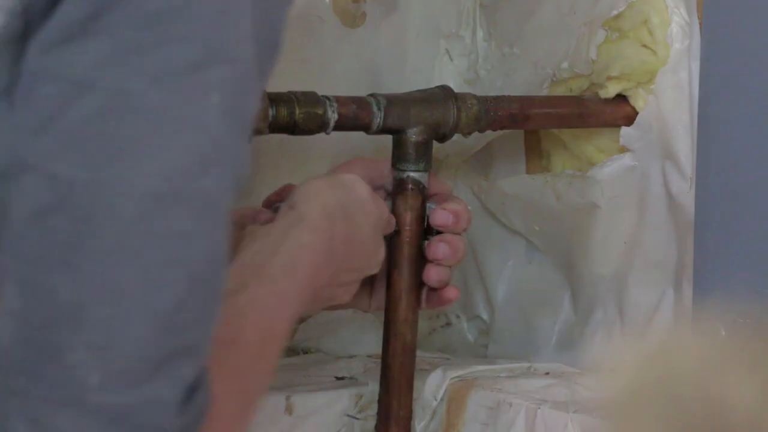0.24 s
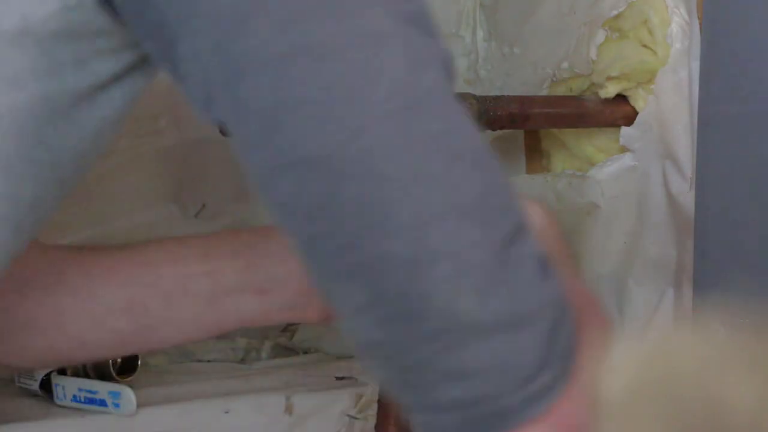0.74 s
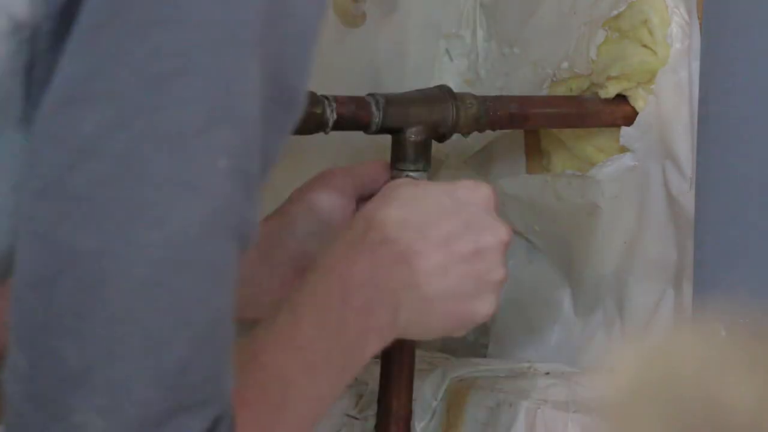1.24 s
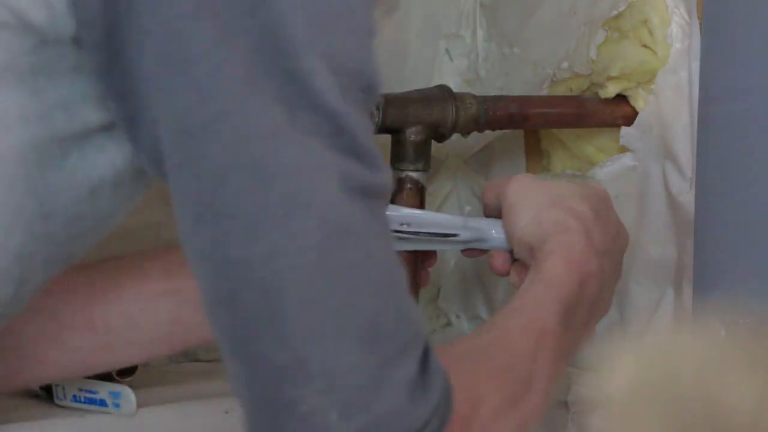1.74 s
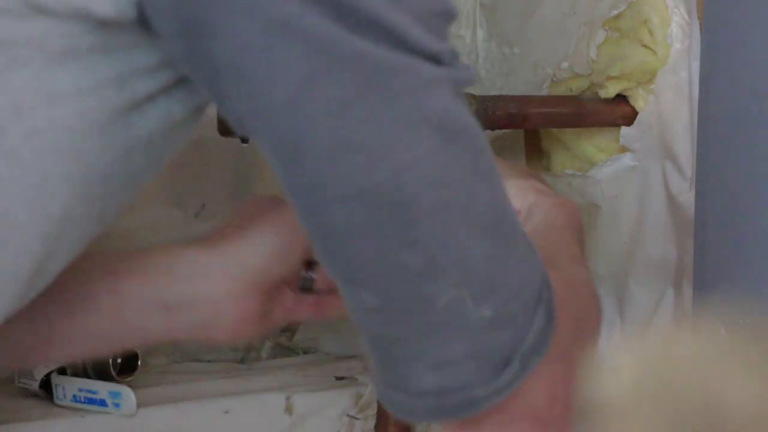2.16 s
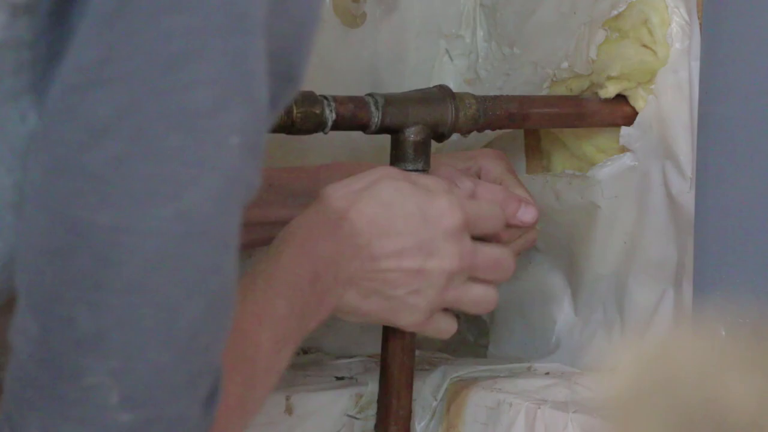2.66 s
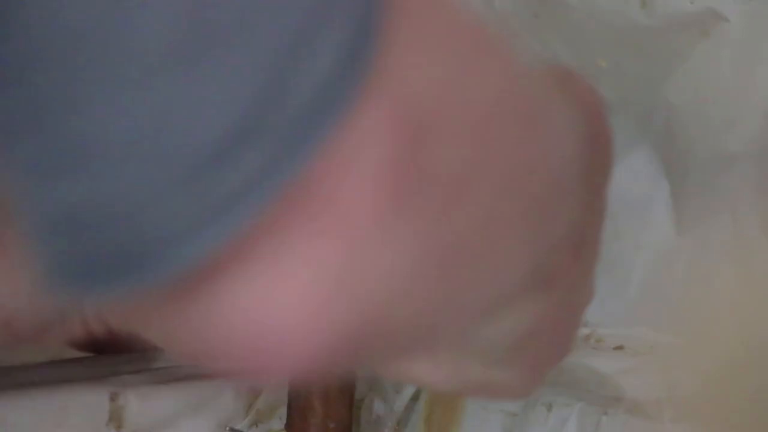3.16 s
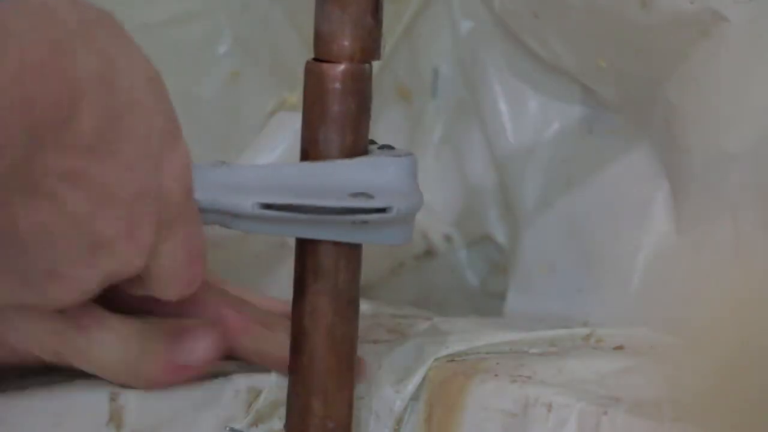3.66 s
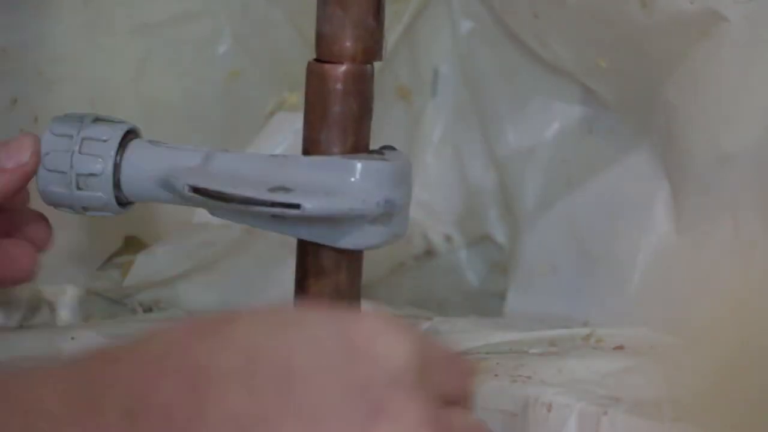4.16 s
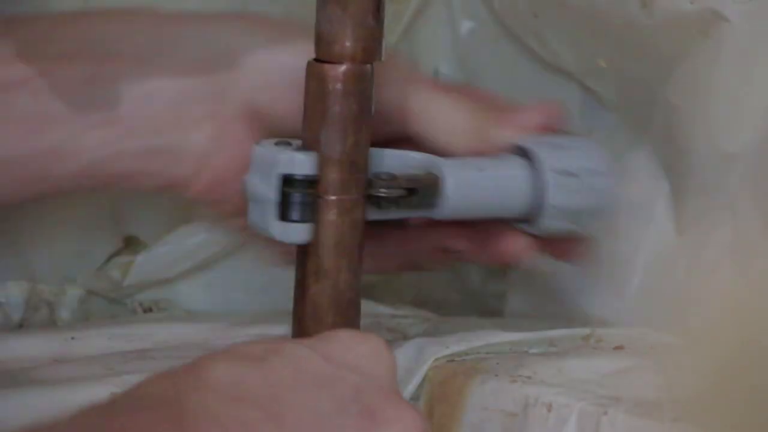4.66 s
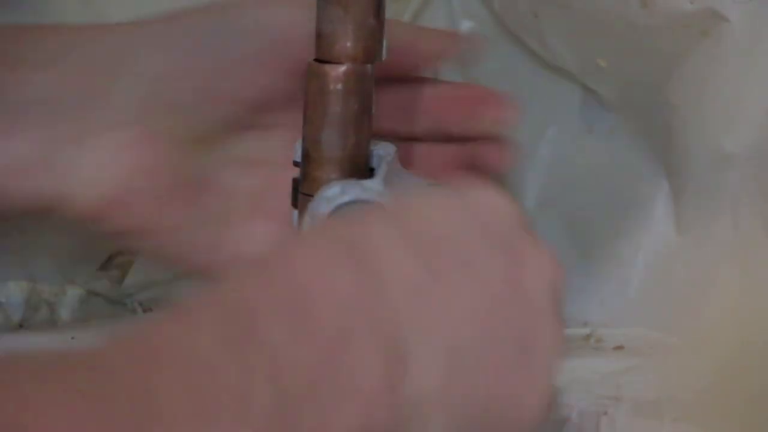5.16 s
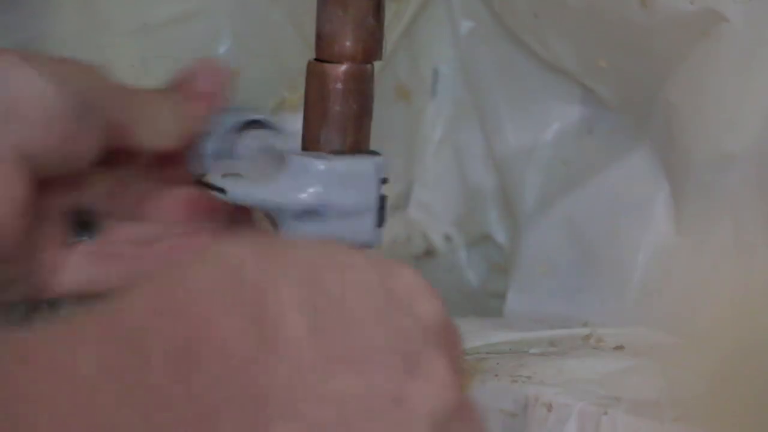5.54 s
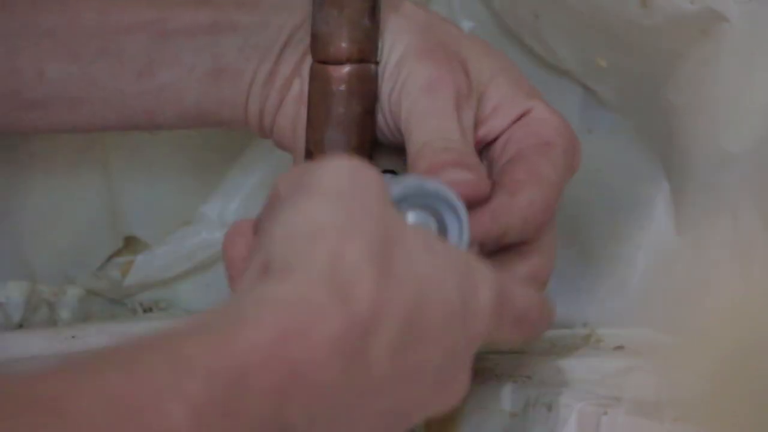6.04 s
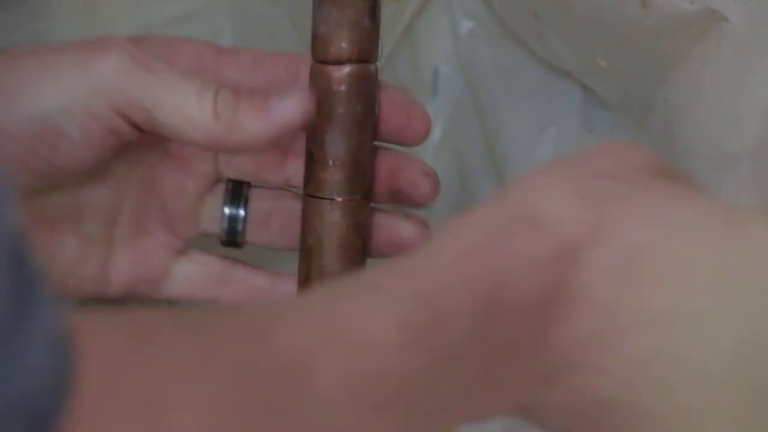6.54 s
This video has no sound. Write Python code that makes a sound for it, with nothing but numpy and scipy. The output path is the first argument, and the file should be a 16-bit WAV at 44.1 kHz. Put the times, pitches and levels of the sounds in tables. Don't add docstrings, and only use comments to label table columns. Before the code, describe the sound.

A tubing cutter scrapes and clicks around a copper pipe in a quiet basement, with soft knocks, low rumble and one loud hollow clank near the end.

```python
import sys
import numpy as np
from scipy import signal
from scipy.fft import rfft, irfft
from scipy.io import wavfile
from scipy.ndimage import uniform_filter1d

SR = 44100
rng = np.random.default_rng(int(sys.argv[2]) if len(sys.argv) > 2 else 0)


def volts_from_db(level):
    exponent = np.asarray(level, float) / 20
    return 10 ** exponent


def master(y):
    cut = np.clip(np.atleast_2d(y).T, -1, 1)
    pcm = np.round(cut * 32767)
    wavfile.write(sys.argv[1], SR, pcm.astype(np.int16))


N = 299968

# centre in Hz, width in Hz, level in dB.
CUTTER_MODES = [(2190, 490, -1), (3006, 335, 0), (3300, 216, 5.5), (3554, 423, 1.5), (4730, 1040, -8.5),
                (1750, 187, -2)]
# centre in Hz, width in Hz, level in dB.
EDGE_MODES = [(5030, 1150, 4), (6000, 2800, 3), (8300, 3060, 2.5), (10340, 4500, -1.5), (13600, 11200, -15)]
# centre in Hz, width in Hz, level in dB.
BODY_MODES = [(786, 760, 4.5), (1113, 260, 11), (1326, 183, 8.5), (1926, 320, 8)]
# centre in Hz, width in Hz, level in dB.
PIPE_MODES = [(203.5, 14, -4.5), (285, 65.4, 3.5), (412, 52, 0.5), (465.5, 85, -2), (720, 230, -17.5),
              (1000, 160, -14), (1464, 350, -19), (1750, 480, -19.5)]


def unit(x):
    return x / np.sqrt(np.mean(x ** 2))


def add(out, start_s, x):
    i = int(start_s * SR)
    out[i:i + len(x)] += x[:N - i]


def resonance(x, hz, width_hz):
    b, a = signal.iirpeak(hz, hz / (1.956 * width_hz), fs=SR)
    once = signal.lfilter(b, a, x)
    return signal.lfilter(b, a, once)


def modes(x, table):
    power = 0
    total = 0
    for k, (hz, width_hz, db) in enumerate(table):
        power += np.pi * width_hz / SR * volts_from_db(db) ** 2
        total = total + (-1) ** k * volts_from_db(db) * resonance(x, hz, width_hz)
    return total / np.sqrt(power)


def walk(rate_hz):
    hold = int(SR / rate_hz)
    steps = np.repeat(rng.standard_normal(N // hold + 1), hold)
    slewed = uniform_filter1d(uniform_filter1d(steps, hold), hold)
    return unit(slewed[:N])


def grit(per_s, spread_db):
    hit = rng.random(N) < per_s / SR
    size = volts_from_db(spread_db * np.minimum(rng.exponential(size=N), 3.5))
    impacts = unit(hit * size * rng.standard_normal(N))
    return unit(impacts + 0.6 * rng.standard_normal(N))


def swell(t, rise_s, t60_s):
    up = np.sin(np.pi / 2 * np.clip(t / max(rise_s, 1 / SR), 0, 1)) ** 2
    fade = 1000 ** (-np.maximum(t - rise_s, 0) / max(t60_s, 0.004))
    return up * fade


def strokes(table, rest_db, second_rest_db):
    ends_db = -17
    t = np.arange(N) / SR
    first, second = volts_from_db(rest_db), volts_from_db(second_rest_db)
    for start, top, end, db, second_db in table:
        away = (t - top) / np.where(t < top, top - start, end - top)
        gain = volts_from_db(db + ends_db * away ** 2)
        first = np.hypot(first, gain)
        second = np.hypot(second, volts_from_db(second_db) * gain)
    return first, second


def basement():
    # frequency in Hz, density in dB per Hz.
    hiss_curve = [(15, -54), (25, -23), (49, -4), (87, -9.5), (123, -26), (185, -28), (206, -8.5),
                  (263, -22), (326, -13), (363, -16), (754, -18), (1370, -17), (16000, -27.5)]
    # frequency in Hz, rms level in dB, wobble in dB.
    hum_partials = [(62, -81, 1), (120, -67.5, -0.5), (183, -76, 0.5)]
    hiss_db = -64.5
    curve_hz, curve_db = np.transpose(hiss_curve)
    f = np.maximum(np.arange(N // 2 + 1) * SR / N, 1)
    colour = volts_from_db(np.interp(np.log(f), np.log(curve_hz), curve_db))
    hiss = unit(irfft(rfft(rng.standard_normal(N)) * colour, N))
    t = np.arange(N) / SR
    hum = np.zeros(N)
    for hz, db, wobble_db in hum_partials:
        level = np.sqrt(2) * volts_from_db(db + wobble_db * walk(4.92))
        hum += level * np.sin(2 * np.pi * hz * t + 0.5 * walk(4.1))
    return volts_from_db(hiss_db) * hiss + hum


def rings():
    # start in seconds, fade t60 in seconds,
    # pitch in Hz, peak in dB.
    slips = [(2.625, 0.053, 3470, -56), (3.635, 0.043, 3670, -43.5), (3.677, 0.042, 1530, -40),
             (3.768, .05, 1505, -53), (4.006, 0.023, 3300, -50), (4.27, 0.028, 3300, -52),
             (4.63, 0.2, 1744, -60), (5.645, 0.05, 4270, -59), (5.648, .05, 9150, -65),
             (5.655, .04, 10000, -68), (5.703, .02, 15200, -64), (5.772, 0.081, 10000, -60),
             (5.775, .06, 13700, -68), (5.774, 0.065, 3230, -54), (5.815, .02, 3300, -67),
             (6.005, 0.13, 116, -38), (6.035, 0.055, 940, -44), (5.617, 0.032, 1510, -35),
             (6.235, 0.04, 1750, -51), (6.309, 0.043, 1640, -46.5), (6.325, 0.068, 95, -38.5),
             (6.613, 0.018, 1590, -38), (6.598, 0.045, 3470, -47.5), (6.617, 0.039, 720, -25),
             (6.618, 0.1, 114, -35.5), (6.639, 0.029, 757, -30.5)]
    # start in seconds, fade t60 in seconds, pitch in Hz, peak in dB.
    struck = [
        (6.0, 0.14, 3650, -46),
        (6.0, 0.074, 2306, -40.5),
        (6.163, 0.043, 896, -54),
        (6.185, 0.12, 930, -54),
        (6.6125, 0.023, 1000, -21.5),
    ]
    t = np.arange(SR // 3) / SR
    out = np.zeros(N)
    for table, rise_share in [(slips, 0.15), (struck, 0.082)]:
        for start, t60, hz, db in table:
            drift = np.cumsum(rng.standard_normal(len(t))) * 0.04
            flutter = 1 + 7 * uniform_filter1d(rng.standard_normal(len(t)), size=200)
            tone = np.sin(2 * np.pi * hz * t + drift)
            add(out, start, volts_from_db(db) * swell(t, rise_share * t60, t60) * flutter * tone)
    return out


def knocks():
    # start in seconds, peak in dB, pitch in Hz,
    # t60 in seconds.
    hand_knocks = [(0.373, -35, 105, 0.07), (0.392, -43.5, 95, 0.12), (0.47, -55, 94.2, 0.19),
                   (2.655, -47.5, 350, 0.033), (3.448, -51, 290, 0.065), (3.472, -38.5, 297, 0.065),
                   (3.489, -41.5, 296, 0.042), (3.526, -42, 325, 0.037), (3.683, -39, 567, 0.03),
                   (3.69, -39.5, 236, 0.033), (3.827, -50, 368, 0.05), (3.84, -53.5, 320, 0.059),
                   (3.869, -52, 126, 0.17), (4.284, -43, 328, 0.038), (4.295, -49, 527, 0.047),
                   (4.308, -48, 115, 0.05), (4.384, -44, 420, 0.021), (4.965, -42, 205, 0.069),
                   (5.135, -49.5, 222, 0.037), (5.157, -49, 108, 0.088), (5.522, -50, 426, 0.1),
                   (5.615, -28, 340, 0.025), (5.693, -26, 265, 0.038), (6.505, -43.5, 147, 0.12),
                   (6.6126, -12, 447, 0.027), (6.623, -22.5, 420, 0.028), (6.634, -31, 396, 0.04),
                   (6.641, -25.5, 488, 0.031), (6.655, -40, 316, 0.07)]
    # start in seconds, peak in dB, pitch in Hz, t60 in seconds,
    # overtone relative to peak in dB.
    tool_knocks = [(0.351, -34.5, 330, 0.023, 5), (0.361, -33, 103, 0.037, 9.5),
                   (0.57, -46.5, 258, 0.024, -10), (0.617, -53, 128, 0.06, 10), (1.924, -45, 136, 0.059, 0),
                   (2.439, -45.5, 131, 0.098, 7), (2.96, -53, 306, 0.08, -10),
                   (3.203, -46.5, 468, 0.023, 11.5), (5.633, -37, 273, 0.061, -4),
                   (5.708, -31.5, 195, 0.095, -3), (5.77, -39, 280, 0.14, -7),
                   (5.853, -40.5, 285, 0.06, -2), (6.005, -34.5, 209, 0.089, -1.5),
                   (6.03, -39.5, 200, 0.07, -10), (6.116, -50, 124, 0.043, 12.5),
                   (6.284, -45, 207, 0.26, 5), (6.316, -36, 210, 0.071, -2)]
    hand_push_s, tool_push_s, hand_overtone_db = 0.0036, 0.0023, -23
    blows = [(*row, hand_overtone_db, hand_push_s) for row in hand_knocks]
    blows += [(*row, tool_push_s) for row in tool_knocks]
    t = np.arange(SR // 3) / SR
    out = np.zeros(N)
    for start, db, hz, t60, overtone_db, push_s in blows:
        force = swell(t, push_s, t60)
        shake = rng.standard_normal(len(t)) * force
        thump = force * np.sin(2 * np.pi * hz * t)
        tail = 0.34 * modes(shake, PIPE_MODES[:6])
        overtone = 0.31 * volts_from_db(overtone_db) * modes(shake * force, BODY_MODES[:2])
        add(out, start, volts_from_db(db) * (thump + tail + overtone))
    return out


def clicks():
    # start in seconds, peak in dB, body relative to peak
    # in dB, edge relative to peak in dB.
    ticks = [(0.3354, -54, -7, -6), (0.3495, -38, 1, -3), (0.6182, -34, 3.5, -3.5), (2.6223, -49.5, 3, 0),
             (3.2046, -32.5, -6.5, -6), (3.2558, -28.5, -8, -10.5), (3.4235, -43, -6, -16),
             (3.4637, -42, -14, -1), (3.507, -49, -17, -18), (3.530, -41.5, -3.5, -5),
             (3.6643, -28.5, -8, -12), (3.6795, -32.5, 1.5, -4), (3.7517, -39, -2, -14),
             (4.2926, -45.5, -0.5, -6), (5.2945, -53, -10, -22), (5.3037, -29, -11, -13.5),
             (5.3622, -37.5, -2, -7), (5.7048, -40, 0, -6), (5.9979, -20, -7.5, -3), (6.2698, -35, -16, 3),
             (6.3105, -33.5, -6.5, -3), (6.3854, -48.5, 0, -20), (6.6419, -36.5, -12, 1.5)]
    # start in seconds, peak, body and edge in dB as above.
    snaps = [
        (3.3276, -24.5, -12, -1.5),
        (3.3782, -29.5, -3.5, -23),
        (5.3174, -35.5, -29, -2),
        (5.4144, -37, -14, -6),
        (5.8626, -44.5, -18, -12),
    ]
    # start in seconds, peak in dB, body relative to
    # peak in dB.
    taps = [(0.0732, -45.5, 0), (0.3554, -45, 8), (0.8814, -56, 5.5), (1.1099, -49, 1), (1.924, -56, 3),
            (2.6554, -50, 10), (2.8038, -53, 3.5), (3.843, -58, 10), (5.0494, -51.5, 5.5),
            (5.6161, -38.5, 17), (6.6118, -39, -1)]
    # start in seconds, peak, body and edge in dB as above.
    slides = [(0.0362, -54, 9, -16), (0.1884, -51, 4.5, -8), (0.2159, -46.5, 2, -18),
              (0.3626, -40.5, 15, -23), (1.0394, -59, 2, -11), (1.5184, -54, 4, -10),
              (3.3374, -44, -9, -13), (3.5647, -27.5, -1, -11), (3.636, -42, -11, -15),
              (3.7693, -42, -6, -10), (4.267, -43.5, -7, -7), (4.3725, -44, -1, -14), (5.019, -41, -12, -6),
              (5.6161, -36, -9, -22), (5.628, -49, -5, -6), (5.6845, -36.5, 6.5, -8),
              (5.8511, -50.5, -7, -18), (5.9494, -53, -1, -14), (6.11, -58, 11, -14),
              (6.1614, -51.5, 1, -14), (6.3345, -46, -15, -18)]
    # start in seconds, peak, body and edge in dB as above.
    rubs = [(0.159, -51.5, -2, -3), (1.0108, -49.5, -4, -18), (2.4277, -49.5, 4, 4.5),
            (2.4424, -49, -11, 2.5), (3.1724, -45, -10, -4), (4.0058, -45.5, -7, -9),
            (5.005, -42, -10, -10), (5.671, -43.5, 9, -19), (5.7635, -39.5, -8, -5.5),
            (5.7794, -40, 4.5, -13), (6.0214, -33.5, -19, -3.5), (6.2407, -51, 5, -4), (6.288, -48, 2, -1),
            (6.592, -40, -11, -18)]
    tap_edge_db, slide_s = -28, 0.0027
    dull_taps = [(*row, tap_edge_db) for row in taps]
    # contacts, t60 in seconds, slide in seconds
    kinds = [(ticks, 0.042, 0), (snaps, 0.021, 0), (dull_taps, 0.036, 0),
             (slides, 0.038, slide_s), (rubs, 0.075, slide_s)]
    t = np.arange(SR // 5) / SR
    out = np.zeros(N)
    for table, t60, slide in kinds:
        for start, db, body_db, edge_db in table:
            force = 0.38 * rng.standard_normal(len(t)) * swell(t, slide, t60)
            if slide == 0:
                force = force + 1.38 * np.exp(-t / 0.00004)
            top = modes(force * swell(t, slide, 0.017), EDGE_MODES[3:])
            edge = modes(force, EDGE_MODES[:3]) + 0.06 * top
            body = modes(force, BODY_MODES)
            x = modes(force, CUTTER_MODES) + volts_from_db(body_db) * body + volts_from_db(edge_db) * edge
            add(out, start, volts_from_db(db) * x)
    return out


def turning():
    # start, strongest moment and end in seconds, scrape in dB,
    # treble relative to scrape in dB.
    wheel_strokes = [(-0.1, 0.2, 0.5, -76, 4), (1.95, 2.14, 2.24, -73, -6), (2.4, 2.6, 2.87, -73.5, 6),
                     (2.9, 3.01, 3.1, -69.5, -3), (3.11, 3.28, 3.47, -55.5, -1),
                     (3.42, 3.61, 3.864, -53.5, -3), (3.6, 3.76, 3.83, -60.5, 6.5),
                     (4.2, 4.32, 4.45, -75, 1.5), (4.5, 4.76, 4.87, -70, -6), (4.84, 4.89, 5.2, -69, 1.5),
                     (5.27, 5.37, 5.46, -61, 4.5), (5.58, 5.74, 5.85, -61, -6), (5.9, 5.985, 6.02, -64, 0),
                     (5.98, 6.1, 6.24, -70, 3), (6.19, 6.27, 6.43, -58.5, 1.5), (6.5, 6.64, 6.95, -70.5, 7)]
    # start, strongest moment and end in seconds, rumble in dB,
    # wall relative to rumble in dB.
    roller_pushes = [(-0.05, 0.2, 0.34, -73, -7), (0.45, 0.8, 0.89, -70, -6), (1.7, 2.0, 2.2, -73, -7),
                     (2.4, 2.6, 2.87, -71.5, 4), (2.88, 3.01, 3.1, -63.5, -2),
                     (3.11, 3.2, 3.36, -68.5, 1.5), (3.41, 3.48, 3.66, -51, -2), (3.6, 3.69, 3.8, -71, 9),
                     (3.78, 3.83, 4.0, -60, -9), (4.22, 4.41, 4.52, -62, 0), (4.4, 4.66, 4.76, -53.5, -6.5),
                     (4.7, 4.8, 4.86, -49.5, -8), (4.84, 4.89, 5.05, -62.5, 3), (5.15, 5.28, 5.5, -80, 8),
                     (5.42, 5.59, 5.63, -62.5, -8), (5.6, 5.63, 5.9, -48.5, -3),
                     (5.68, 5.8, 6.02, -54, -1.5), (5.985, 6.008, 6.17, -47.5, -9),
                     (6.19, 6.33, 6.44, -53.5, -2), (6.5, 6.64, 6.92, -63.5, 6.5)]
    # centre in Hz, width in Hz, level in dB.
    wall_modes = [(71.7, 11.6, -2), (95, 5.5, 4), (147, 36, 2)]
    scrape, treble = strokes(wheel_strokes, -79.5, -84)
    rumble, bass = strokes(roller_pushes, -75, -72.5)
    grind = grit(2500, 3.0) * volts_from_db(2.5 * walk(60))
    frame = modes(grind, CUTTER_MODES[1:5]) + 0.41 * modes(grind, CUTTER_MODES[:1])
    wheel = scrape * (frame + 0.28 * modes(grind, BODY_MODES)) + treble * modes(grind, EDGE_MODES)
    rollers = rumble * volts_from_db(walk(40)) * modes(grit(900, 2.8), PIPE_MODES)
    wall = bass * volts_from_db(2.0 * walk(10)) * modes(rng.standard_normal(N), wall_modes)
    return wheel + rollers + wall


def recess_echo(work):
    t60_s, level_db = 0.11, -14
    t = np.arange(SR // 3) / SR
    tail = rng.standard_normal(len(t)) * 1000 ** (-t / t60_s) * (t > 0.003)
    tail = signal.lfilter([0.5], [1, -0.5], tail)
    wet = signal.fftconvolve(work, tail / np.sqrt(np.sum(tail ** 2)))[:N]
    return volts_from_db(level_db) * wet


def scene():
    work = rings() + knocks() + clicks() + turning()
    return (basement() + work + recess_echo(work))[None]


def top_cut(x):
    return signal.sosfilt(signal.butter(12, 16430, fs=SR, output="sos"), x)


def record(dry):
    low_cut = signal.butter(3, 55, "high", fs=SR, output="sos")
    high_cut = signal.ellip(12, 0.3, 80, 15750, fs=SR, output="sos")
    mix = signal.sosfilt(high_cut, signal.sosfilt(low_cut, dry))
    return top_cut(mix)


dry = scene()
out = record(dry)
master(out)
```